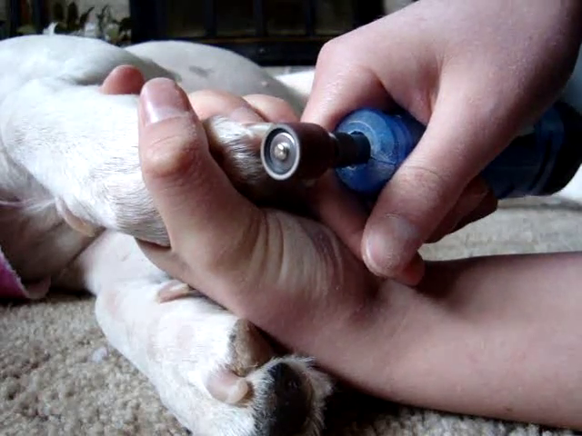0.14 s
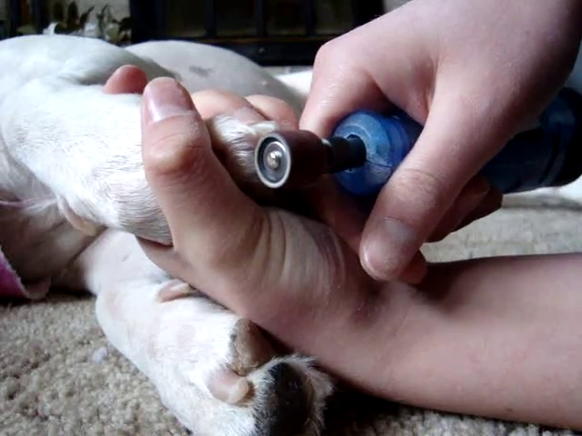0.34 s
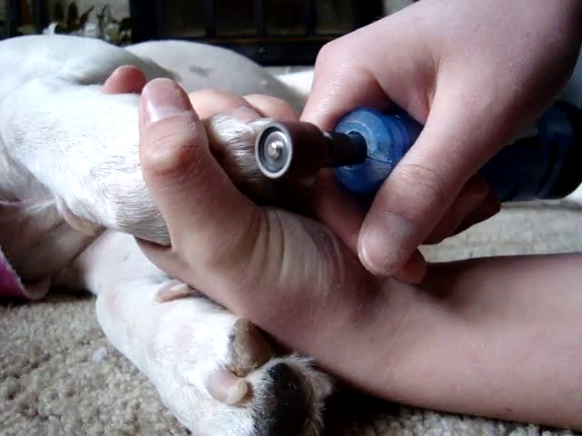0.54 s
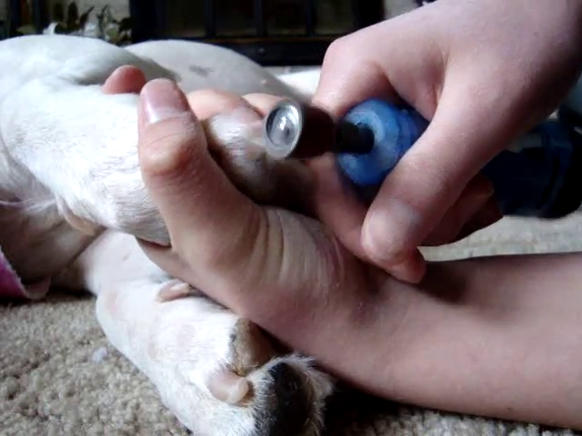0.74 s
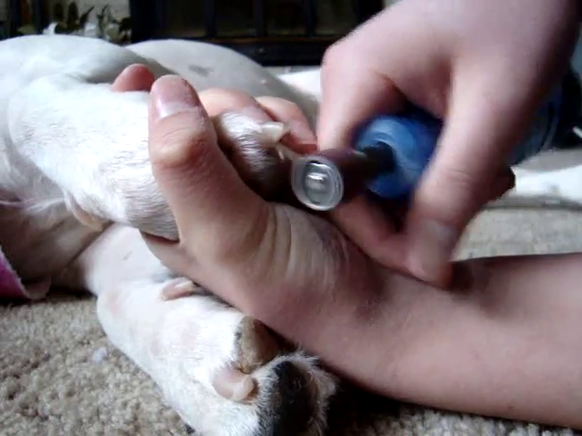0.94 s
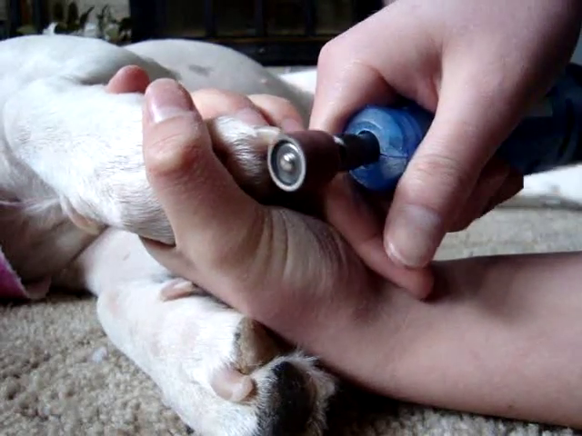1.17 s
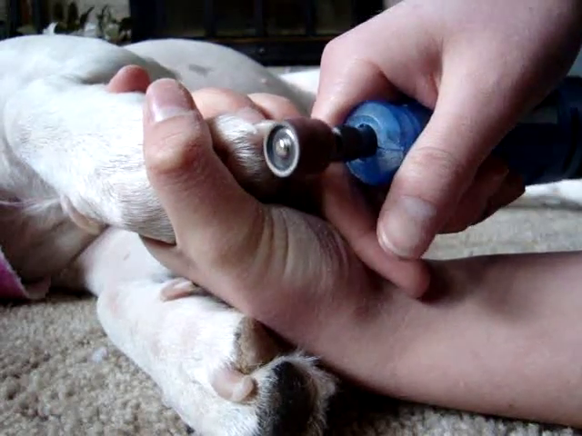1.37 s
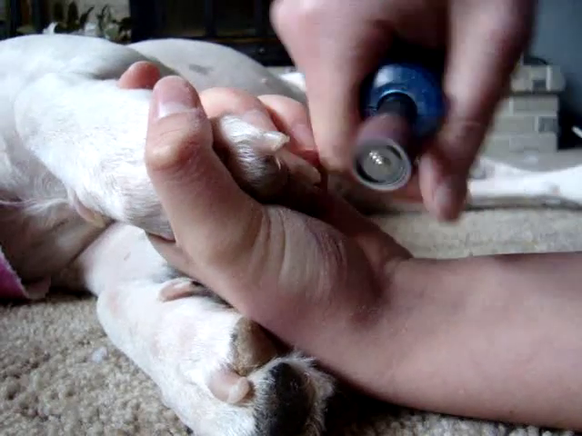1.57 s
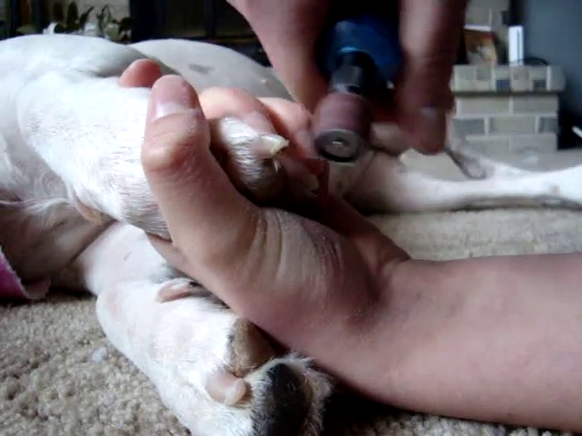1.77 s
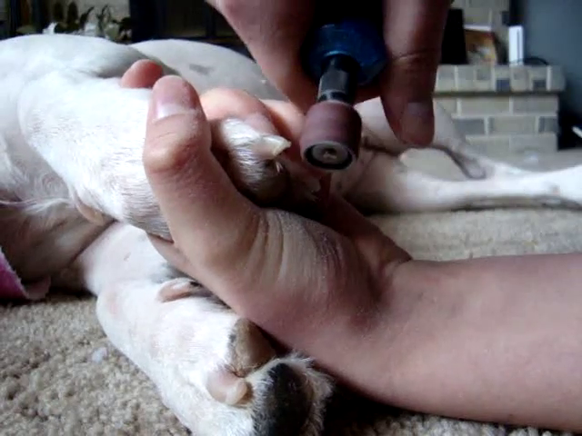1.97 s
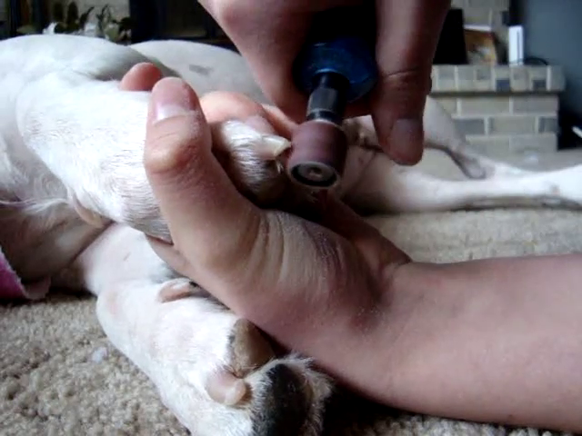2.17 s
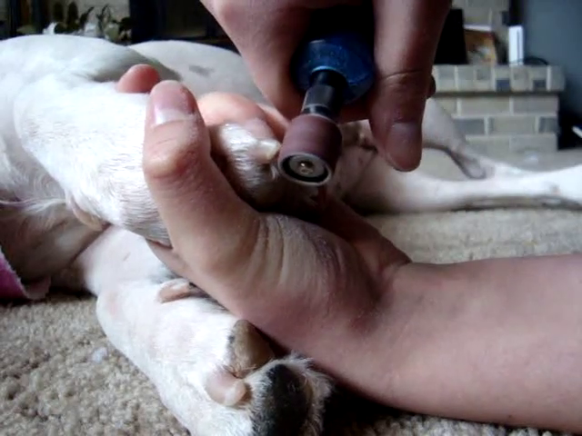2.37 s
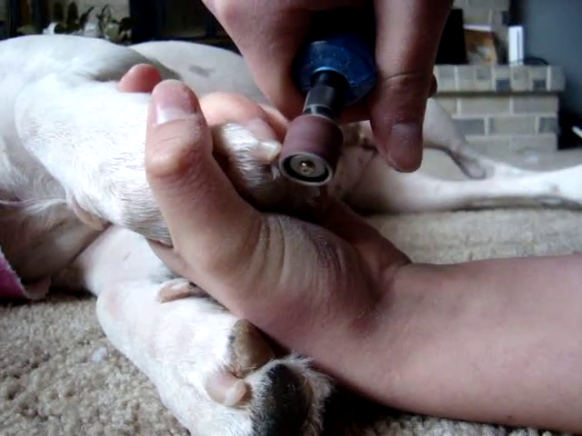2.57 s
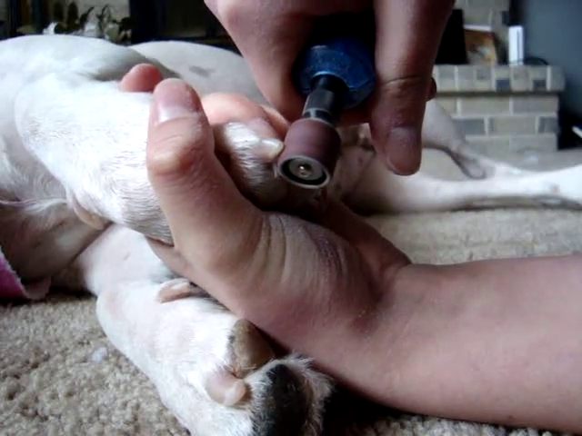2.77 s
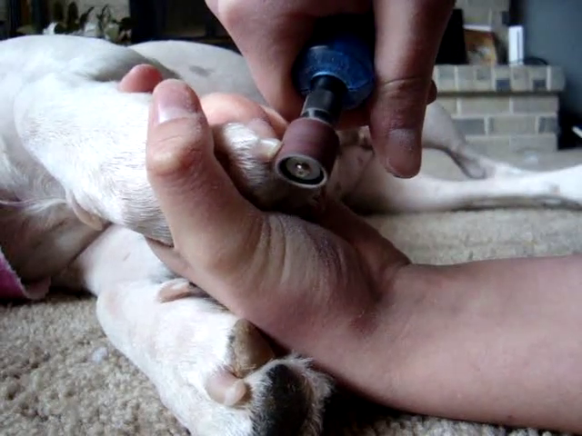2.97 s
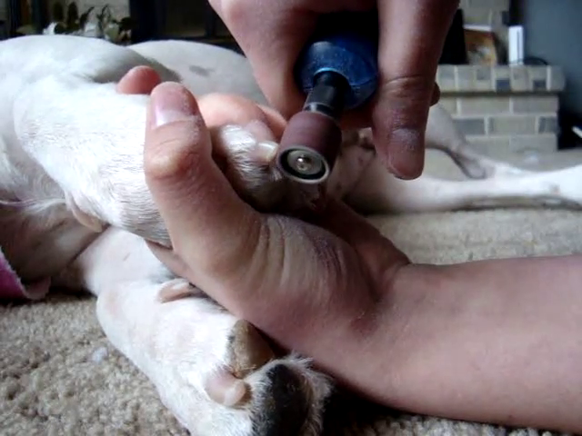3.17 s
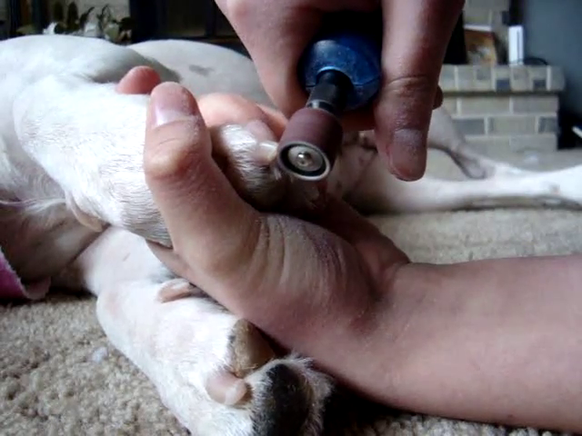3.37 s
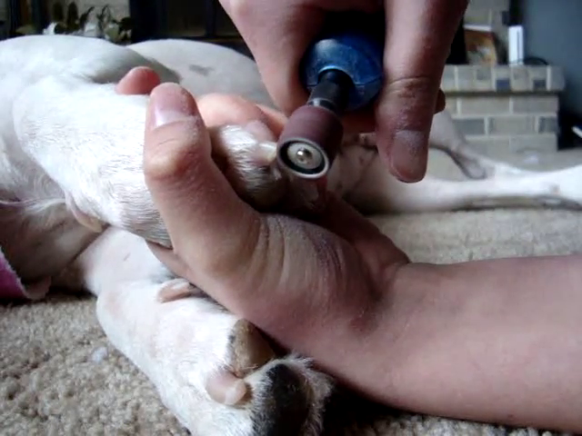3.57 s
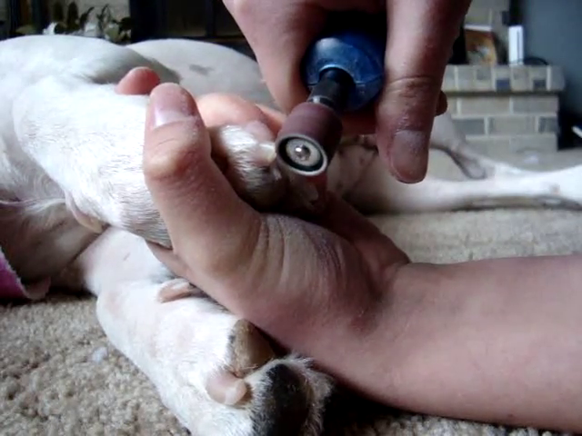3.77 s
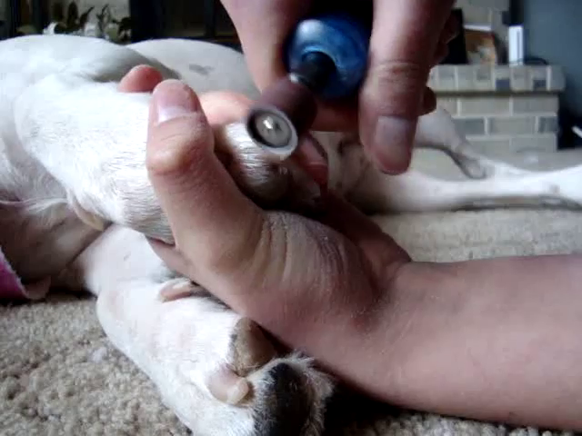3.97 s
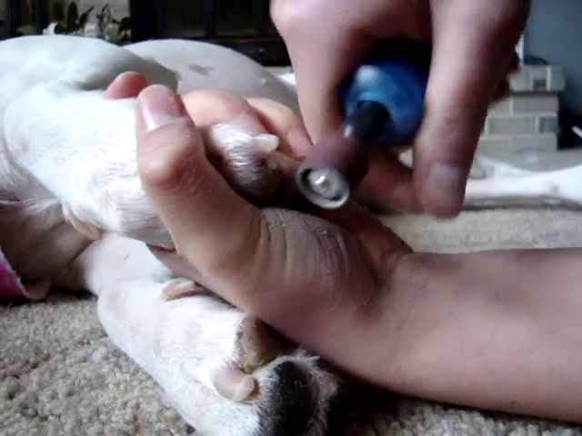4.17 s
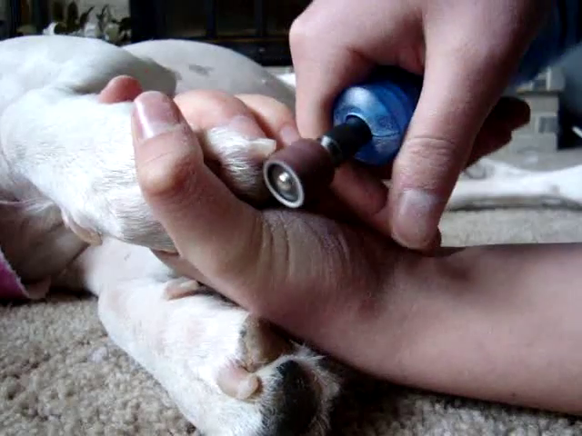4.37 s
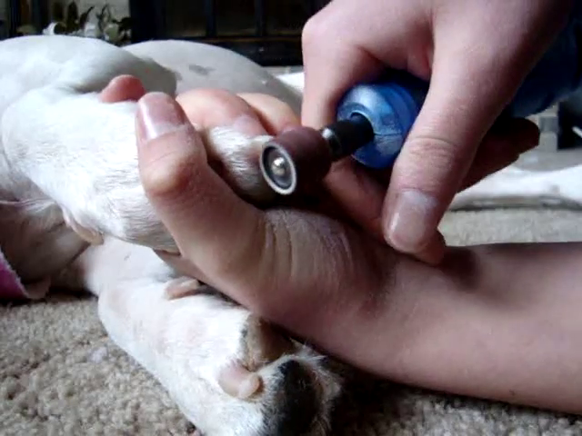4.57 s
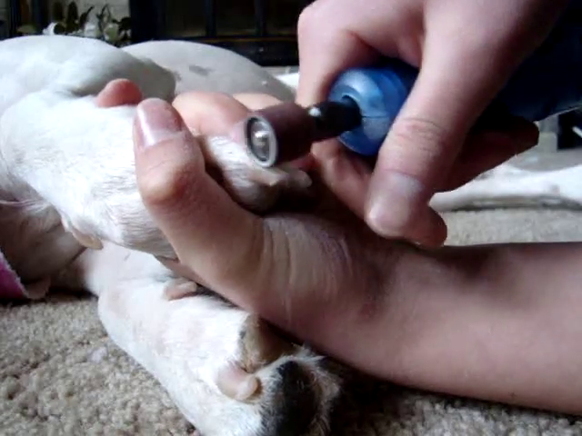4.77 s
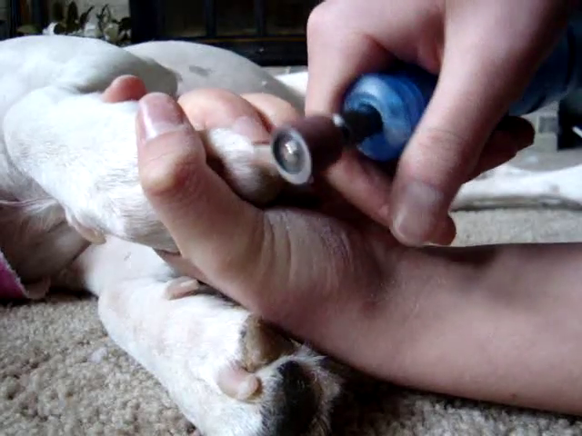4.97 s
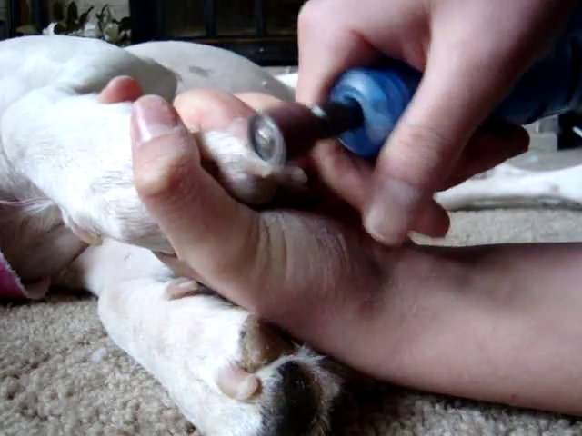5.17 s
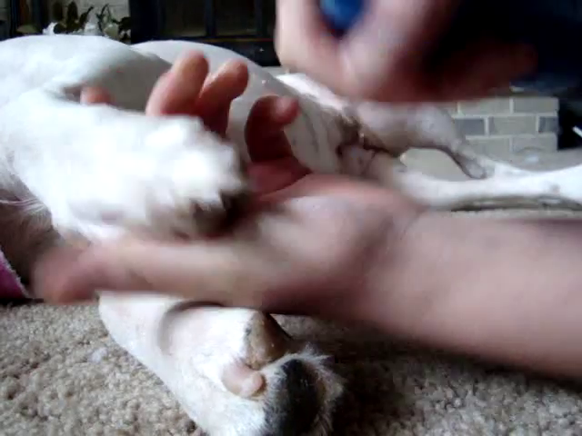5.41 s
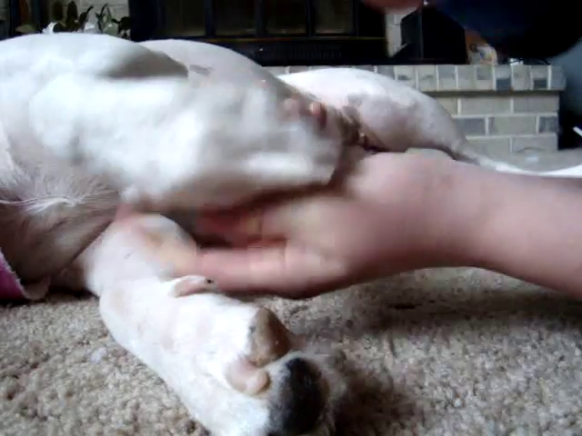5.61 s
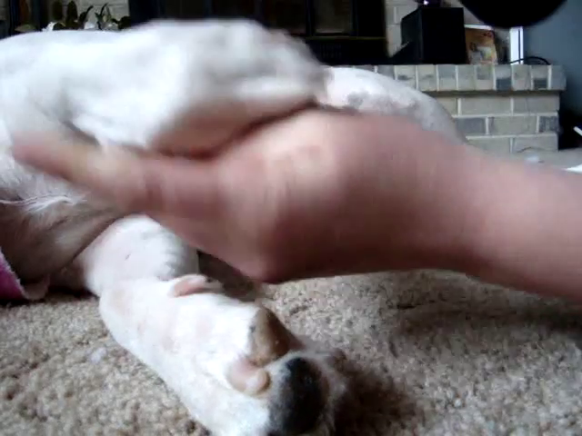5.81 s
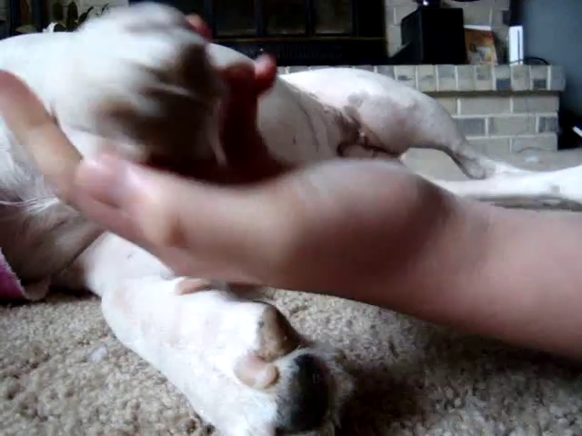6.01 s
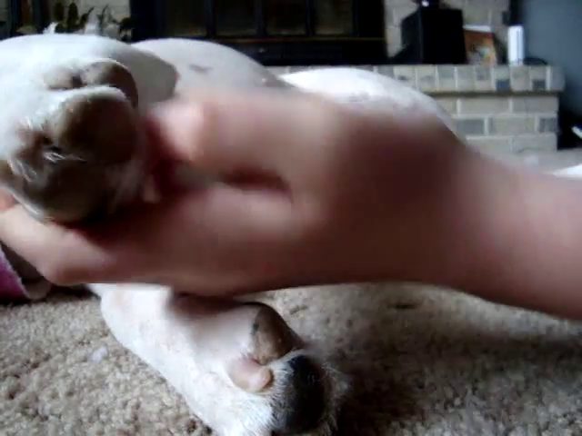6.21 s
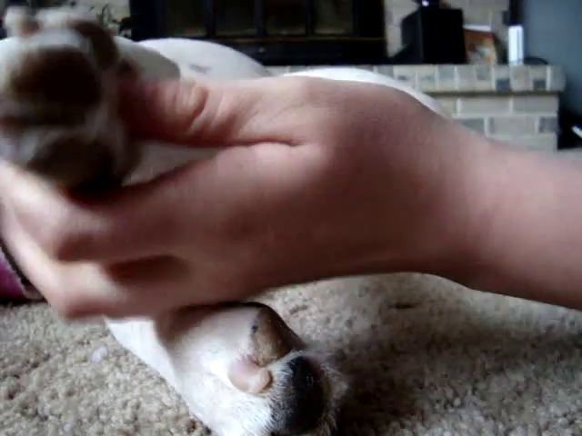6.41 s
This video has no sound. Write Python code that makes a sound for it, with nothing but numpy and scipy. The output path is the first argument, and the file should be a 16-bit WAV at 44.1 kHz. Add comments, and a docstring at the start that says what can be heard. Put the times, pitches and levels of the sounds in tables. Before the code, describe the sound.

Close up in a room, a handheld rotary grinder rasps against a dog's nail in uneven strokes, the longest near the middle. The grinding is bright and gritty, getting louder and fuller with pressure and spitting briefly when the drum catches. Underneath, the little motor whines and buzzes with a thin airy hiss, dipping in pitch under load and quickly recovering. After the last stroke only the steady whine remains.

```python
"""A pitched, gritty rasp comes in strokes: a small cordless rotary tool filing a dog's nail, close up.
The same grit passes the nail at every turn, giving the pitch; it roughens when the drum lands or catches.
A harder press makes the rasp louder and fuller, and drags the motor's whine down from about 134 turns
a second. Brushes and rushing air buzz behind it. The camera's gain control ducks under each stroke
and lets the whine swell back afterwards."""
import sys
import numpy as np
from scipy import signal
from scipy.fft import rfft, irfft, next_fast_len
from scipy.io import wavfile
from scipy.ndimage import uniform_filter1d, map_coordinates

SR = 44100
rng = np.random.default_rng(int(sys.argv[2]) if len(sys.argv) > 2 else 0)


def dump_mix(stems):
    """Bounce the given channels to the path in sys.argv[1] as a 16-bit WAV at rate SR."""
    frames = np.atleast_2d(stems).T  # one column per channel
    limited = np.clip(frames, -1, 1)  # hard clip at full scale
    pcm = np.round(limited * 32767).astype(np.int16)
    wavfile.write(sys.argv[1], SR, pcm)


N = 284445

# Nail and drum ring differently with each grip. Each row: frequency in Hz, relative level in dB.
SIDE_GRIP = [(960, -63), (1040, -13), (1560, -12), (1860, 4.5), (2080, -6.5), (2270, 2.5), (2570, -11),
             (2850, 5), (3130, -4), (3340, 3.5), (3650, -9.5), (5500, -15.5), (8700, -19), (10000, -28.5)]
TIP_GRIP = [(530, -81), (900, -73), (1060, -18), (1310, -24.5), (1770, -8.5), (1960, -13), (2230, -5),
            (2520, -11), (2840, 1), (3510, -22), (4420, -15), (5690, -23.5), (7170, -26.5), (8600, -22.5),
            (10000, -34.5), (13000, -78)]
EDGE_GRIP = [(530, -46), (900, -39.5), (1100, -16.5), (1430, -19.5), (1800, -5.5), (2020, -3.5),
             (2300, -2.5), (2540, -14), (2900, -4.5), (3170, -3), (3800, -10), (5520, -11), (7170, -19.5),
             (8430, -17.5), (10000, -29.5), (13000, -70)]
PRESSED_GRIP = [(530, -47), (900, -39.5), (1110, -14), (1580, -16.5), (1770, 1.5), (1920, -8.5),
                (2060, -2.5), (2520, -4), (2870, 7.5), (3540, -18), (4420, -9.5), (5800, -23),
                (7320, -27.5), (9040, -22.5), (10000, -35), (13000, -74.5)]
# The drum on the nail. Each row: start and end in seconds, grip, ring level in dB at a firm press,
# then body, hiss and thrum in dB against the ring, and the closing drop in dB (negative swells).
STROKES = [ (0.0, 0.863, SIDE_GRIP, -18, 1, -5, -32.5, -5.5),
           (0.872, 0.964, TIP_GRIP, -10.5, -6.5, -5.5, -32, 3),
           (1.363, 1.578, SIDE_GRIP, -18, 2, -6, -29, 0),
           (2.212, 2.237, EDGE_GRIP, -16.5, -8, -18, -34, 15),
           (2.344, 3.053, TIP_GRIP, -10, -3.5, -11.5, -36.5, 2),
           (3.046, 3.201, TIP_GRIP, -9.5, -8, -9, -37.5, -2.5),
           (3.2, 3.631, TIP_GRIP, -7.5, -5.5, -14.5, -40, 3),
           (3.629, 3.987, PRESSED_GRIP, -12, -2, -9, -35, -3.5),
           (3.991, 4.079, PRESSED_GRIP, -16.5, -0.5, -5, -27.5, 1.5),
           (4.53, 5.074, EDGE_GRIP, -10, -5, -11, -38, -5.5),
           (5.139, 5.379, EDGE_GRIP, -8.5, -4.5, -12.5, -37.5, 1), ]
# The drum catches. Each row: time in seconds, relative jolt level in dB, added share of skipping (0-1).
DRUM_CATCHES = [(0.35, -14.5, 0.05), (0.8661, 7.5, 0.5), (1.529, 4.5, 0), (2.344, -7, .2),
                (3.652, -11, 0.72), (3.96, -1.5, 0.81), (4.81, -1.5, 0.43), (5.049, -7.5, 0.13),
                (5.279, 4, 0.25)]
# The paw hums along. Each row: start and end in seconds, multiple of the shaft rate, level in dB.
PAW_HUMS = [(0, 0.297, 3, -55.5), (3.18, 3.65, 5, -45.5), (3.629, 3.97, 5, -42), (5.283, 5.374, 5, -44.5)]
# The shaft under load, one list per press. Each row: time in seconds, turns a second.
PRESS_SPEEDS = [
    [(0, 115.8), (.28, 116), (.4, 121.4), (.49, 121.2), (.62, 117.2), (.82, 115), (.864, 111.5),
     (.926, 122), (.97, 127.4)],
    [(1.36, 133.5), (1.452, 125.2), (1.502, 116.4), (1.534, 117.6), (1.575, 125.5)],
    [(2.34, 131), (2.398, 129.7), (2.426, 118), (2.566, 112.3), (2.634, 112.3), (2.8, 122.3),
     (2.862, 122.5), (2.91, 123), (2.96, 119.2), (3.022, 119.3), (3.144, 115.6), (3.584, 116.7),
     (3.648, 113), (3.71, 115.7), (3.924, 111.0), (3.958, 116.3), (4.012, 117.0), (4.08, 127.9)],
    [(4.53, 133.3), (4.688, 120.1), (4.78, 110.5), (4.86, 112.5), (4.896, 114.4), (4.96, 123.8),
     (5.07, 124.8)],
    [(5.14, 131.5), (5.19, 124.7), (5.228, 124.0), (5.286, 119.0), (5.312, 117.8), (5.38, 128.7)],
]
# The two lead harmonics shift as the tool is turned in the hand.
# Each row: time in seconds, level of the ninth in dB, level of the fifteenth in dB.
LEAD_LEVELS = [(0, -40, -44), (1.05, -46.5, -41), (1.64, -47, -40.5), (1.76, -41.5, -38.5),
               (1.87, -39.5, -40), (2.05, -42, -46), (2.27, -33.5, -49), (2.95, -25.5, -48),
               (3.13, -39.5, -44), (4.15, -39, -45), (4.5, -42, -41), (5.42, -46.5, -37.5), (5.8, -38, -33),
               (6.45, -40.5, -32)]
# The rest of the whine, then the commutator's thin overtones.
# Each row: multiple of the shaft rate, level in dB against WHINE_DB.
SHAFT_HARMONICS = [(2, -40), (3, -37), (4, -38), (5, -37), (6, -36), (7, -28), (8, -21), (10, -15),
                   (11, -26), (12, -32), (13, -30), (14, -21), (16, -23), (17, -24), (18, -20), (19, -23),
                   (20, -29), (21, -31), (22, -33), (23, -32), (24, -23), (25, -27), (26, -21), (27, -16),
                   (28, -23), (29, -24), (30, -18)]
COMMUTATOR_HARMONICS = [(33, -23), (36, -21), (39, -25), (42, -22), (45, -25), (48, -22), (51, -27),
                        (54, -27), (57, -31), (60, -24), (63, -29), (66, -30), (70, -27), (72, -22),
                        (75, -28)]
# Tone colour of the paw's thrum, the brushes and the air round the rotor.
# Each row: frequency in Hz, relative level in dB.
THRUM_EQ = [(25, -20), (70, -19.5), (250, -17.5), (420, -5), (600, 0), (760, -1.5), (950, 2), (1300, -32)]
BRUSH_EQ = [(700, -51.5), (1100, 4), (2900, -19), (3600, 4), (4700, -1.5), (6000, -4), (7200, -12),
            (8200, -7.5), (10000, -6)]
AIR_EQ = [(25, -15.5), (60, -13), (150, -8), (400, -2.5), (1100, -2), (1700, -7), (2800, 2.5), (3700, -0.5),
          (4600, 2.5), (6000, -2.5), (7200, 4), (10000, -4.5)]

WHINE_DB, BUZZ_DB = -36.5, -38.5
FREE_HZ, SPIN_UP_S = 133.65, .035  # the unloaded shaft, and how quickly it recovers
PRESS_DB, FULLER_DB = 5.5, 4  # from no pressure to a firm press: rasp gain, extra gain on its body
SKIP_DB, BITE_HISS_DB = 2, 3  # lift at full skipping, extra hiss at full bite
TOUCH_DB, TOUCH_S = 5.5, .062  # the drum lands gently: this much softer, for about this long
LANDINGS_S = [rows[0][0] for rows in PRESS_SPEEDS[1:]]


def nail_rasp(turns, press, bite, skip, let_up_s=.097):
    """The main voice: in each stroke the grit drives the resonances of nail, drum and paw."""
    t = since(0)
    force = grit_force(turns, skip)
    thrum = coloured(force, THRUM_EQ)
    touching = sum(np.exp(-np.abs(t - landing) / TOUCH_S) for landing in LANDINGS_S)
    strength = amp(PRESS_DB * (press - 1) + SKIP_DB * skip - TOUCH_DB * touching)
    out = np.zeros(N)
    for start, end, grip, ring_db, body_db, hiss_db, thrum_db, drop_db in STROKES:
        nail = coloured(force, grip)
        low = filtered(nail, lambda hz: below(hz, 2520))
        high = filtered(nail, lambda hz: 1 - below(hz, 3710))
        ring = unit(nail - low - high)
        body = amp(body_db + FULLER_DB * (press - 1)) * unit(low)
        hiss = amp(hiss_db + BITE_HISS_DB * bite) * unit(high)
        letting_up = np.interp(t, [max(start, end - let_up_s), end], [0, 1])
        envelope = gate(start, end, fade_s=.017) * strength * amp(ring_db - drop_db * letting_up)
        out += envelope * (ring + body + hiss + amp(thrum_db) * thrum)
    return out


def grit_force(turns, skip, lopsided_db=1.03):
    """Grit on the nail: a repeating track, plus fresh scrapes whenever the nail skips."""
    scrapes = lambda: unit(rng.standard_normal(N) * amp(3.4 * wobble(700)))
    # coarse bumps come round again; the finest scratches are new at every turn
    repeating = lambda hz: .1 + .9 / (1 + (hz / 4700) ** 8)
    coarse = filtered(surface(turns, memory=5.75, spiky_db=1.5), lambda hz: np.sqrt(repeating(hz)))
    fine = filtered(scrapes(), lambda hz: np.sqrt(1 - repeating(hz)))
    track = .85 * coarse + fine
    # the drum is slightly out of round and presses hardest once a turn; a skipping nail bounces on it
    pulse_db = lopsided_db * np.cos(2 * np.pi * (turns + .14 * wobble(3.53)))
    bounce_db = .62 * np.sqrt(skip) * wobble(170)
    return unit(amp(pulse_db + bounce_db)) * (np.sqrt(1 - skip) * track + np.sqrt(skip) * scrapes())


def catch_jolts(width_s=.0073):
    """Each catch of the drum spits a short burst of midrange noise."""
    bursts = sum(amp(db) * np.exp(-((since(0) - s) / width_s) ** 2) for s, db, _ in DRUM_CATCHES)
    midrange = lambda hz: .47 / np.sqrt(1 + (hz / 3500) ** 4) * (hz / (hz + 600)) ** 3
    return filtered(bursts * rng.standard_normal(N), midrange)


def motor_whine(turns, press, skip, weaken_db=8):
    """Shaft harmonics; under load a skipping nail shakes the shaft, roughening them and dipping the ninth."""
    ninth_db, fifteenth_db = curves(LEAD_LEVELS)
    shake = np.minimum(press, 1) * skip
    shaken = turns + .014 * shake * wobble(150)
    ninth_db = ninth_db - weaken_db * shake
    tone = lambda order, db: amp(db) * np.sqrt(2) * np.sin(2 * np.pi * (order * shaken + rng.random()))
    whine = tone(9, ninth_db) + tone(15, fifteenth_db)
    for order, db in SHAFT_HARMONICS + COMMUTATOR_HARMONICS:
        if order in (8, 10):  # sidebands ride on the ninth
            drift_db = -.5 + .32 * (ninth_db - ninth_db.mean()) + .65 * wobble(5.3)
        else:
            drift_db = .98 * wobble(2.885)
        whine += tone(order, WHINE_DB + db + drift_db)
    return whine


def motor_buzz(turns):
    """Ticking brushes and rotor air, coloured by a shifting reflection off hand and paw."""
    brushes = coloured(surface(turns, memory=22, spiky_db=5), BRUSH_EQ)
    air = coloured(rng.standard_normal(N), AIR_EQ)
    direct = brushes + amp(-2.5) * air
    delay_ms = 1.04 + .27 * wobble(2.5)
    reflection = map_coordinates(direct, [np.arange(N) - delay_ms * SR / 1000])
    return amp(BUZZ_DB) * unit(direct + .13 * reflection)


def paw_hum(turns):
    """Now and then the paw hums faintly along with a low shaft harmonic."""
    out = np.zeros(N)
    for start, end, order, db in PAW_HUMS:
        envelope = gate(start, end, fade_s=.04) * amp(db + 1.1 * wobble(12))
        out += envelope * np.sin(2 * np.pi * order * turns)
    return out


def shaft_speed(creep_hz=.7, creep_s=.45):
    """Turns a second: dragged down by each press, then running up fast and creeping the last bit."""
    speed = curves(PRESS_SPEEDS[0])[0]
    for rows in PRESS_SPEEDS:
        start, (end, last_hz) = rows[0][0], rows[-1]
        sag = (FREE_HZ - creep_hz - last_hz) * np.exp(-since(end) / SPIN_UP_S)
        sag += creep_hz * np.exp(-since(end) / creep_s)
        speed = np.select([since(end) > 0, since(start) > 0], [FREE_HZ - sag, curves(rows)[0]], speed)
    return speed


def effort(speed, firm_sag_hz=17, full_bite_hz_per_s=100, smooth_s=.021):
    """How hard the drum is pressed (1 = firm) and how fast it bites (0-1), from the drag on the shaft."""
    slowing = uniform_filter1d(-np.gradient(speed) * SR, int(smooth_s * SR))
    press = (FREE_HZ - speed + SPIN_UP_S * slowing) / firm_sag_hz
    return np.maximum(press, 0), np.clip(slowing / full_bite_hz_per_s, 0, 1)


def skipping(steady=.18, on_landing=.28, settle_s=.37, spread_s=.047):
    """How much the nail skips, 0-1: it flares at each landing of the drum and around each catch."""
    landings = sum((since(s) > 0) * np.exp(-since(s) / settle_s) for s in LANDINGS_S)
    catches = sum(share * np.exp(-np.abs(since(0) - s) / spread_s) for s, _, share in DRUM_CATCHES)
    return np.clip(steady + on_landing * landings + catches, 0, 1)


def surface(turns, memory, spiky_db, places=256):
    """Bumps round a spinning surface, met again at each turn and slowly renewed over `memory` turns."""
    count = int(turns[-1]) + 3
    draws = rng.standard_normal((2, 1024, places))
    blur = np.exp(-.5 * (np.arange(-60, 61) / memory) ** 2)
    height, size = signal.fftconvolve(draws, blur[None, :, None], mode="same", axes=1)[:, :count]
    bumps = height * amp(spiky_db * unit(size))
    bumps = bumps / bumps.std(axis=1, keepdims=True)
    return unit(map_coordinates(bumps.ravel(), [turns * places]))


def gain_control(x, threshold_db=-27, slope=.43, sense_s=.007, release_s=.53):
    """Ducks at once by a share of the excess level, then lets the gain creep back."""
    level_db = 10 * np.log10(np.abs(uniform_filter1d(x ** 2, int(sense_s * SR))) + 1e-12)
    duck_db = slope * np.maximum(level_db - threshold_db, 0)
    release = np.exp(-since(0) / release_s)
    return x * amp(-release * np.maximum.accumulate(duck_db / release, axis=-1))


def amp(db):
    """Decibels to gain."""
    return 10 ** (np.asarray(db) / 20)


def unit(x):
    """Scaled to rms 1."""
    return x / np.sqrt(np.mean(x ** 2) + 1e-20)


def since(start):
    """Seconds since start, 0 before it."""
    return np.maximum(np.arange(N) / SR - start, 0)


def gate(start, end, fade_s):
    """Open from start to end, with a linear fade centred on each edge."""
    t = since(0)
    return np.clip(np.minimum(t - start, end - t) / fade_s + .5, 0, 1)


def curves(rows):
    """One automation curve for each column after the time."""
    times, *columns = np.transpose(rows)
    return [np.interp(since(0), times, column) for column in columns]


def wobble(rate):
    """A smooth random curve, rate knots a second."""
    knots = rng.standard_normal(int(N * rate / SR) + 4)
    coarse = np.arange(0, N + 64, 64)
    return np.interp(np.arange(N), coarse, map_coordinates(knots, [coarse * rate / SR]))


def filtered(x, response):
    """x shaped by a gain that depends on frequency."""
    size = next_fast_len(N + 8192)
    return irfft(rfft(x, size) * response(np.fft.rfftfreq(size, 1 / SR)), size)[..., :N]


def coloured(x, points):
    """x through a (Hz, dB) EQ curve, at rms 1, with a steep low cut under the first point."""
    f, db = np.transpose(points)
    eq = lambda hz: amp(np.interp(np.log(hz + 1), np.log(f), db))
    return unit(filtered(x, lambda hz: eq(hz) * np.minimum(hz / f[0], 1) ** 4))


def below(hz, edge_hz):
    """Gain of a steep low-pass."""
    return 1 / (1 + (hz / edge_hz) ** 24)


def scene():
    """One shaft turns both motor and drum, so whine and rasp bend in pitch together."""
    speed, skip = shaft_speed(), skipping()
    press, bite = effort(speed)
    turns = np.cumsum(speed * (1 + .00062 * wobble(25))) / SR
    motor = motor_whine(turns, press, skip) + motor_buzz(turns)
    filing = nail_rasp(turns, press, bite, skip) + catch_jolts() + paw_hum(turns)
    return (filing + motor)[None]


def record(dry, ceiling=.61, top_hz=10120):
    """The camera rides its gain, rounds off the highest peaks and cuts the top treble."""
    ducked = gain_control(dry)
    rounded = ducked / (1 + np.abs(ducked / ceiling) ** 8) ** (1 / 8)
    return filtered(rounded, lambda hz: hz < top_hz)


dry = scene()
out = record(dry)
dump_mix(out)
```